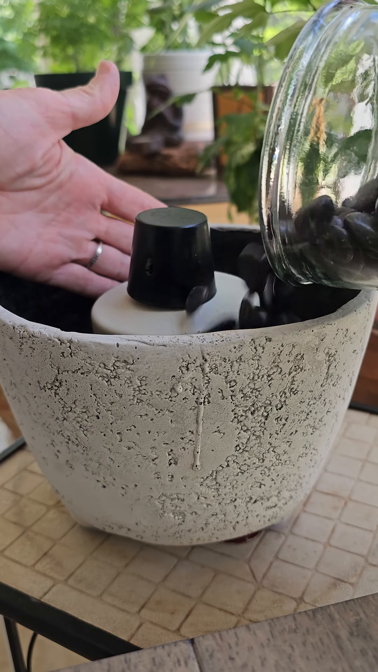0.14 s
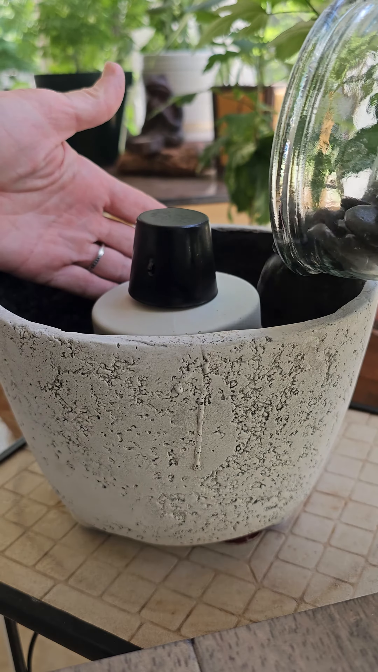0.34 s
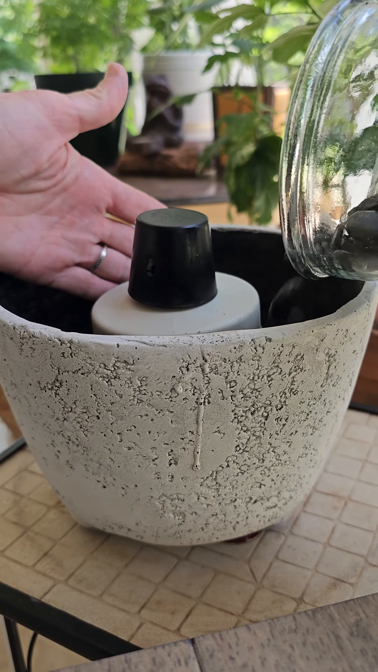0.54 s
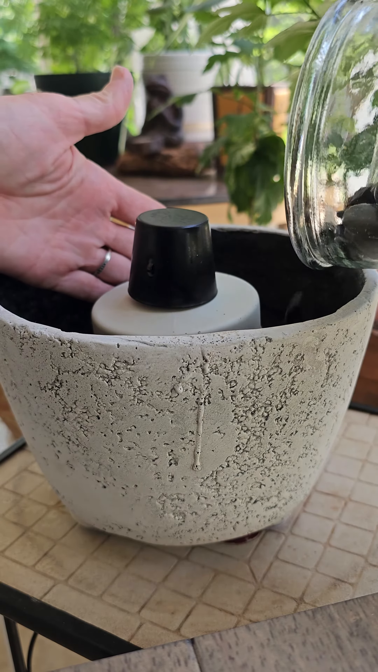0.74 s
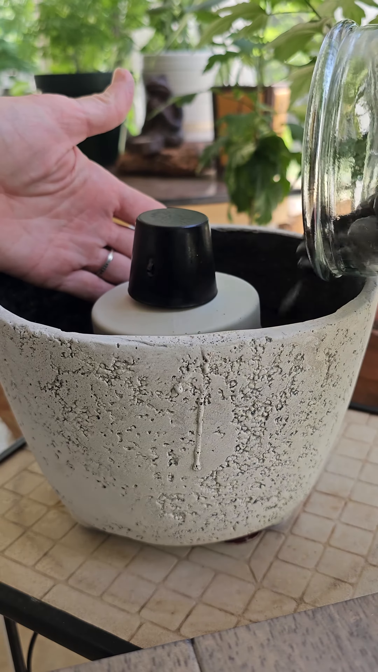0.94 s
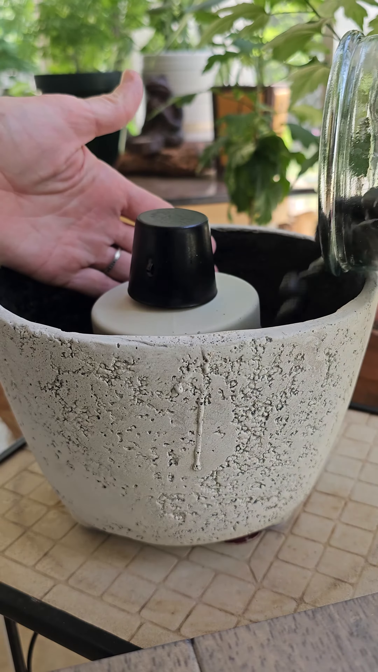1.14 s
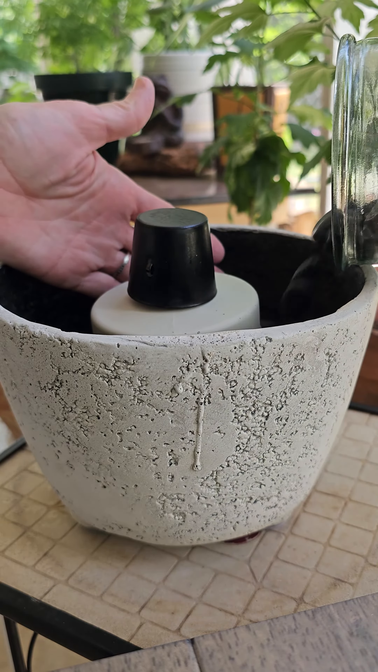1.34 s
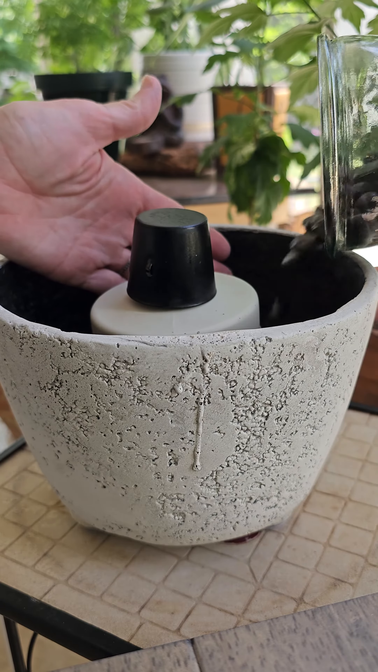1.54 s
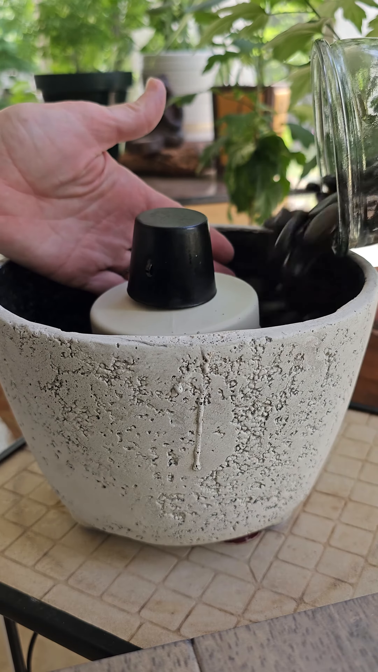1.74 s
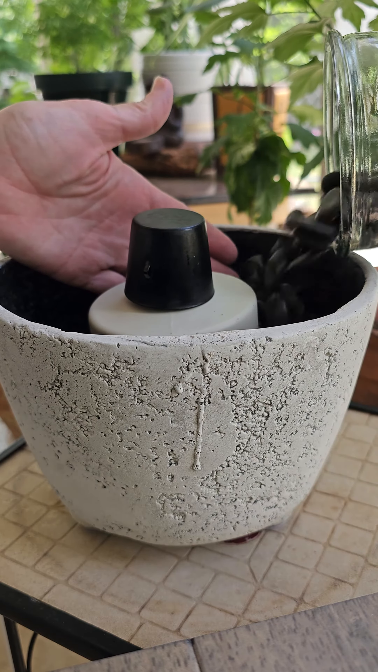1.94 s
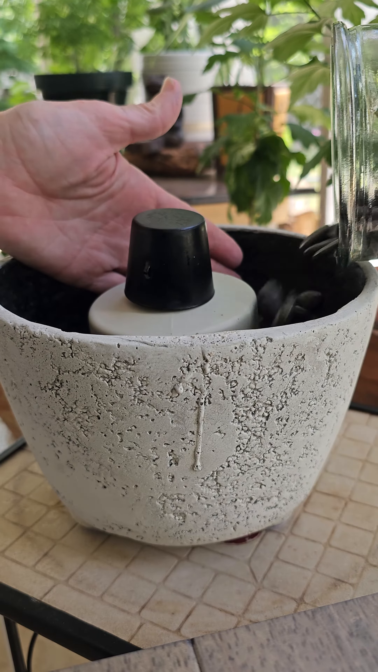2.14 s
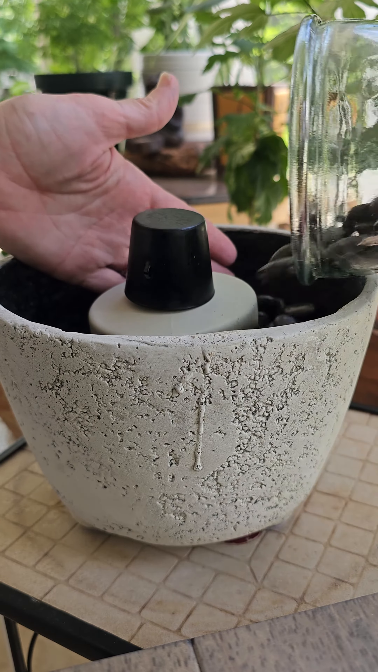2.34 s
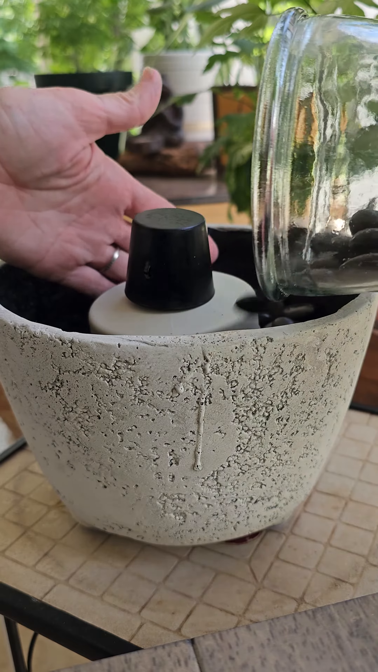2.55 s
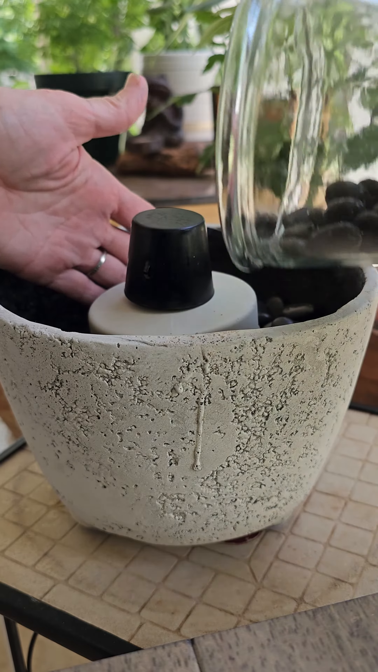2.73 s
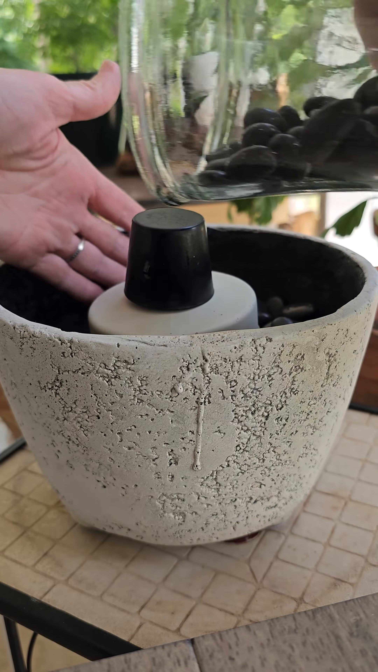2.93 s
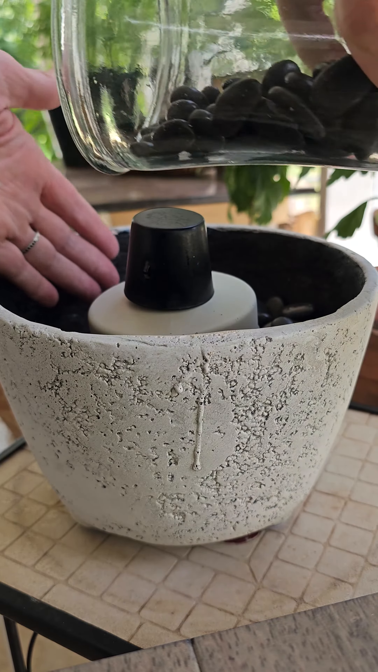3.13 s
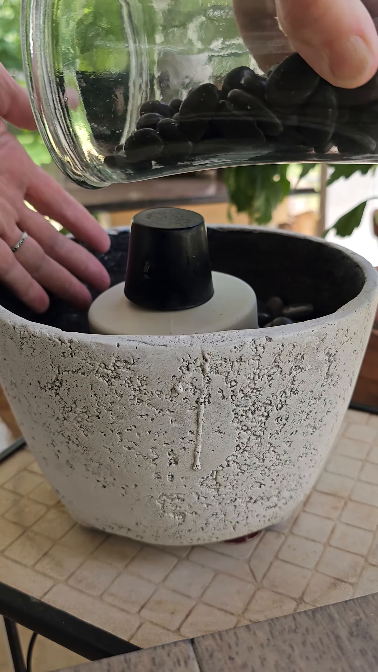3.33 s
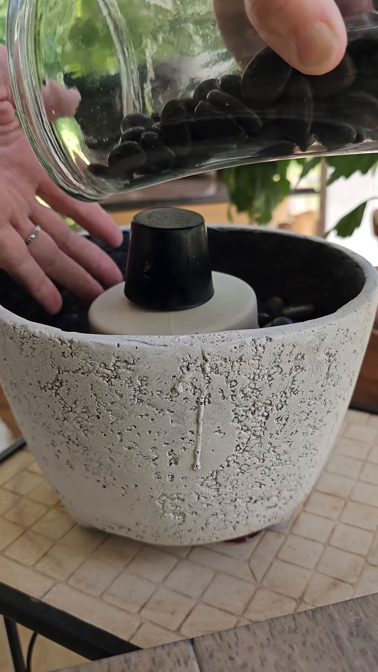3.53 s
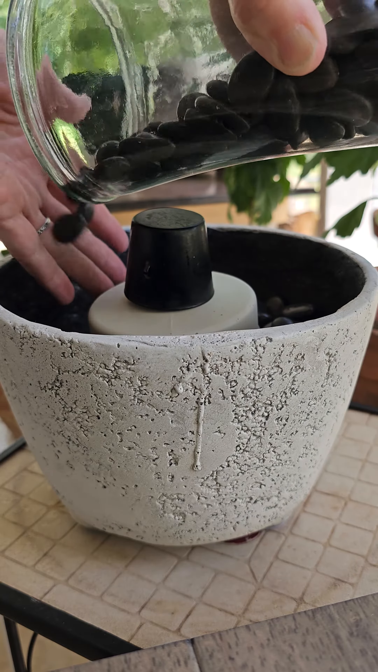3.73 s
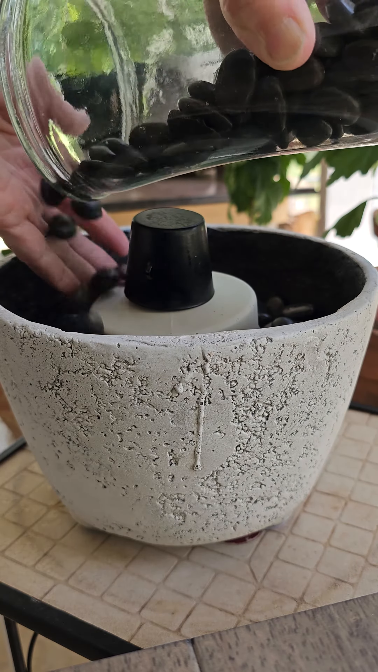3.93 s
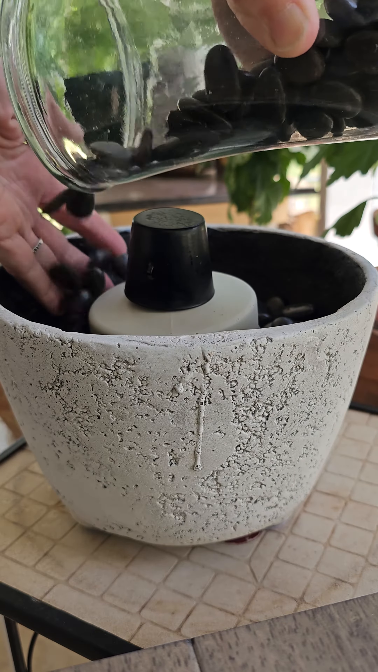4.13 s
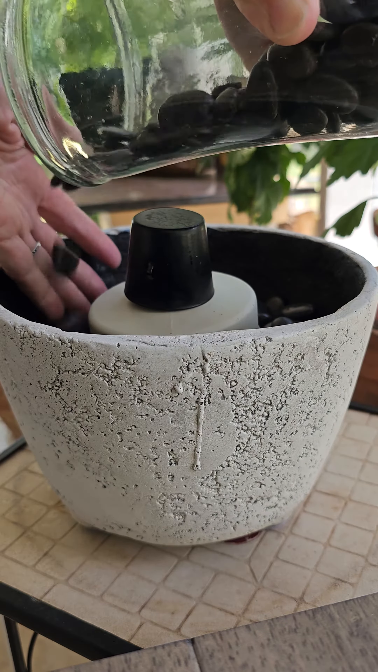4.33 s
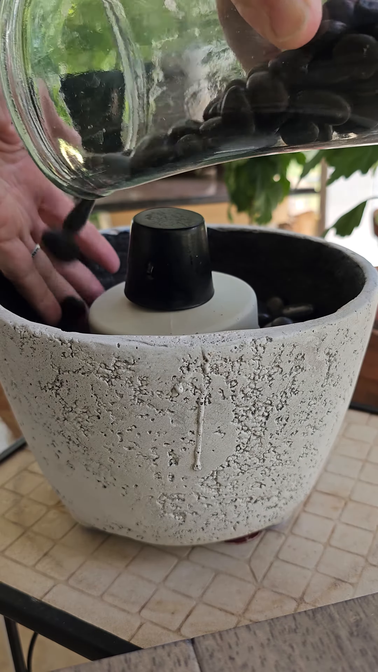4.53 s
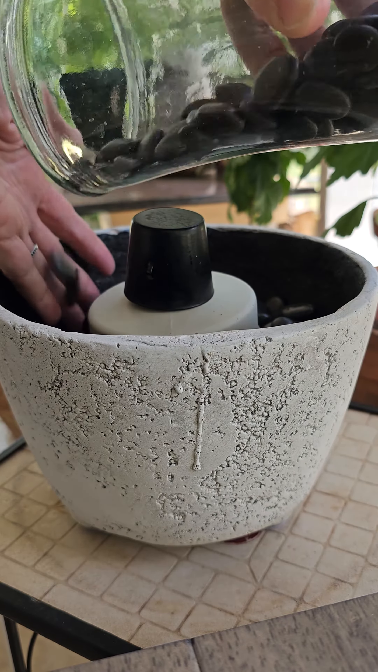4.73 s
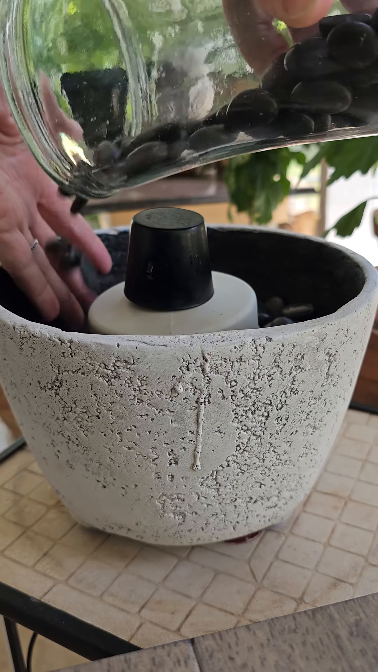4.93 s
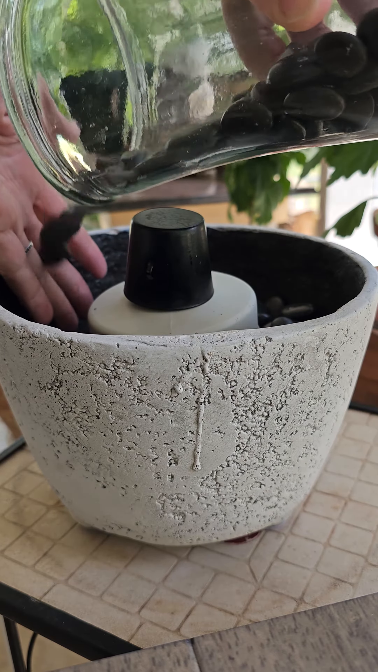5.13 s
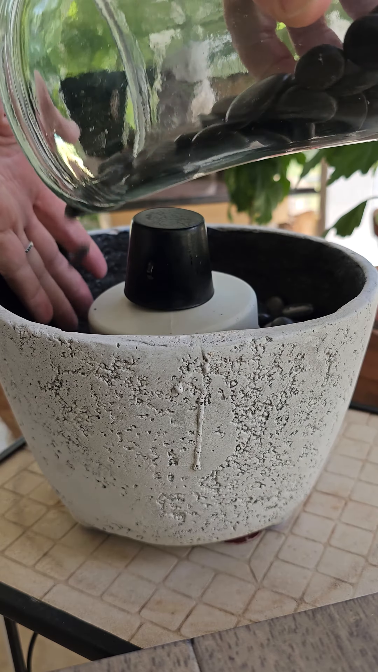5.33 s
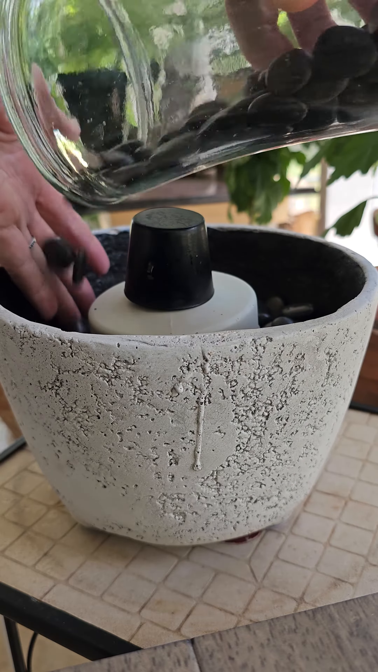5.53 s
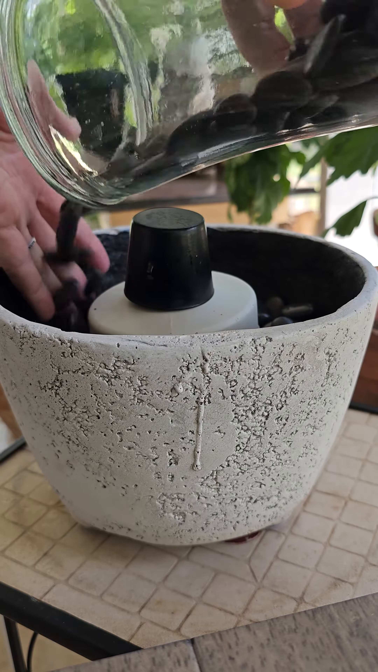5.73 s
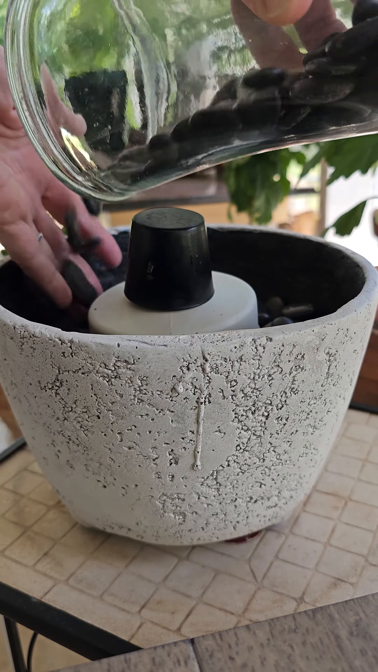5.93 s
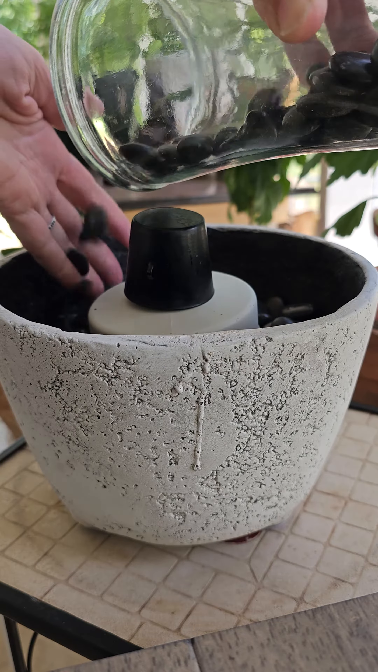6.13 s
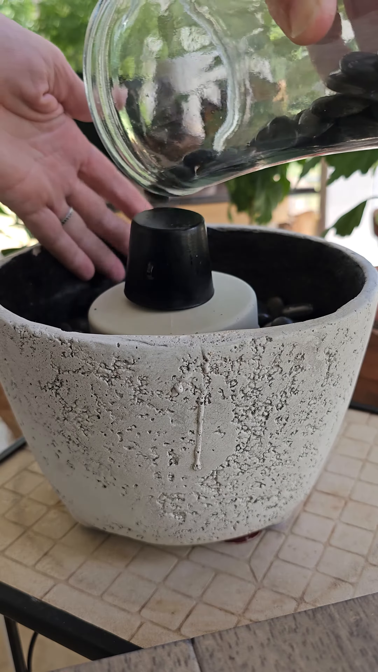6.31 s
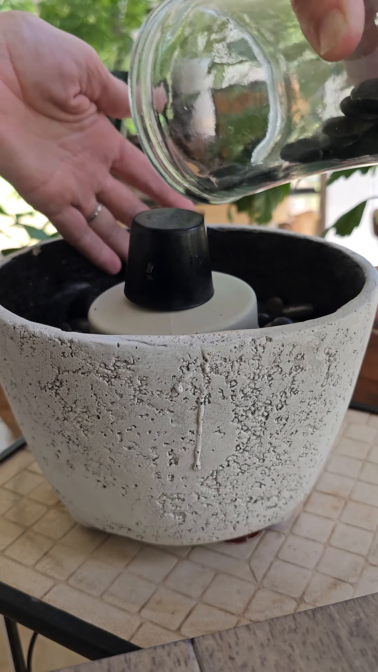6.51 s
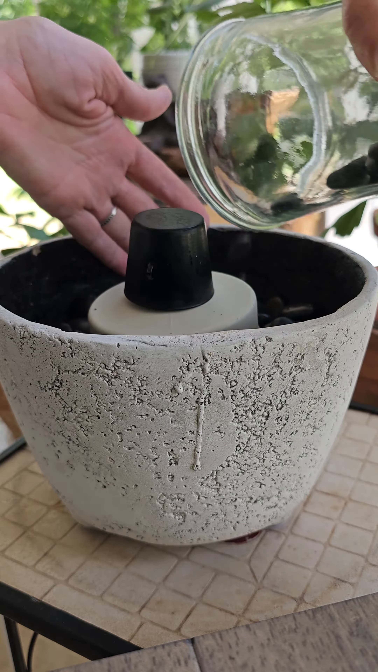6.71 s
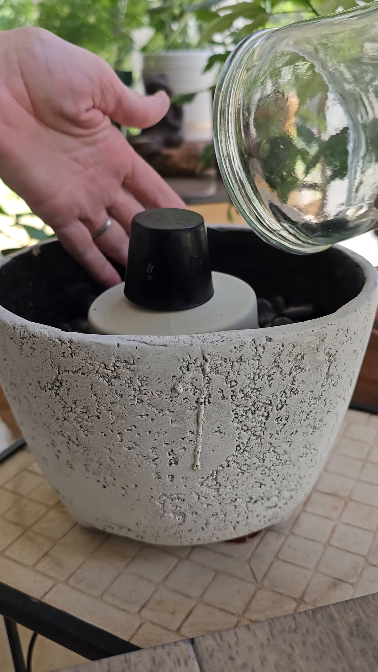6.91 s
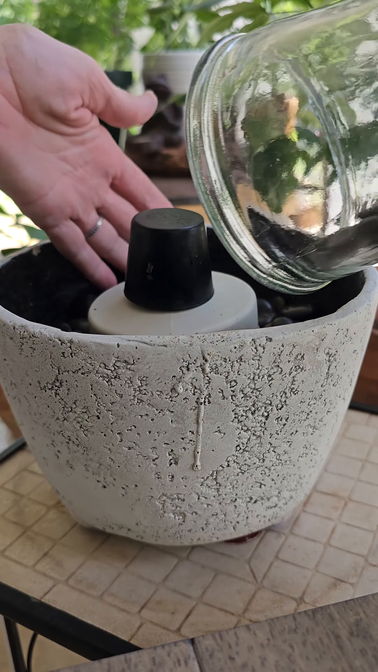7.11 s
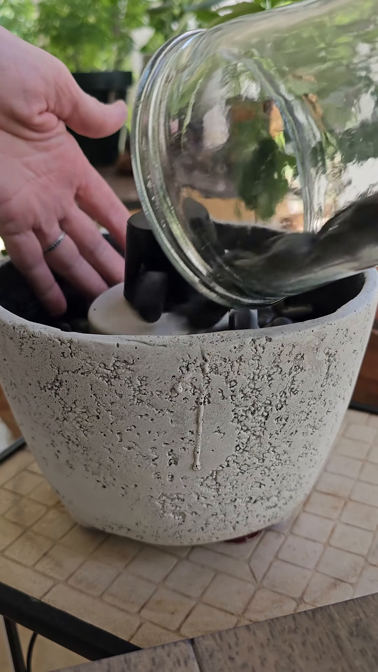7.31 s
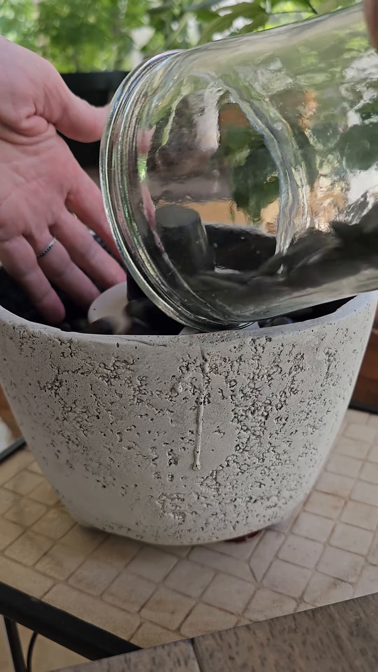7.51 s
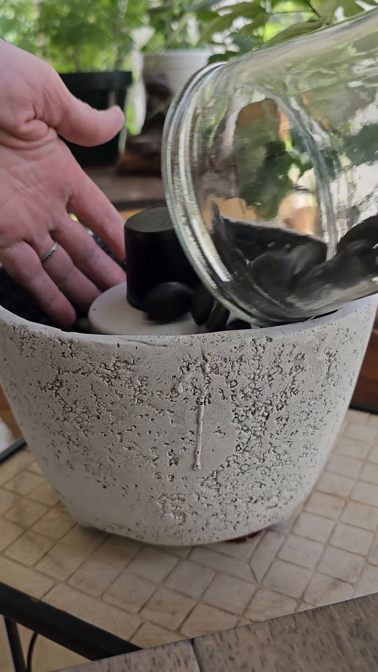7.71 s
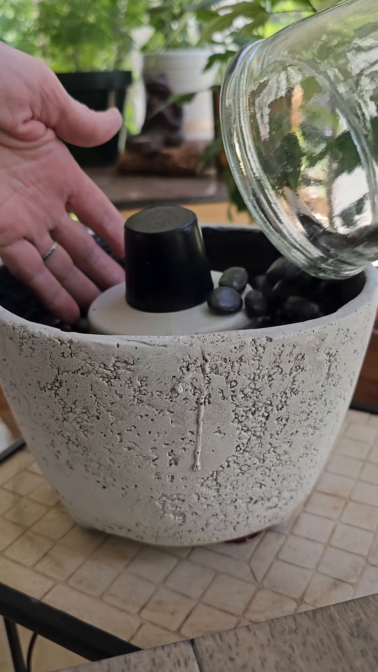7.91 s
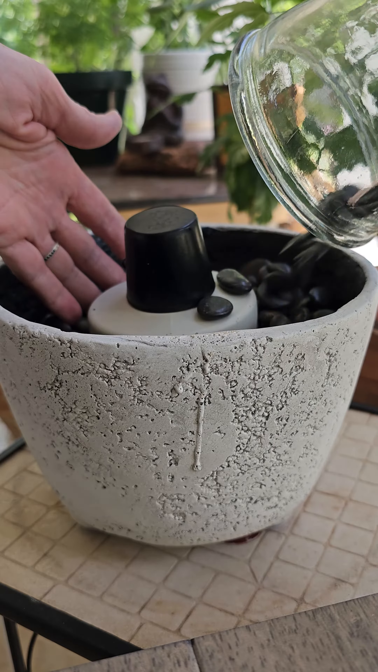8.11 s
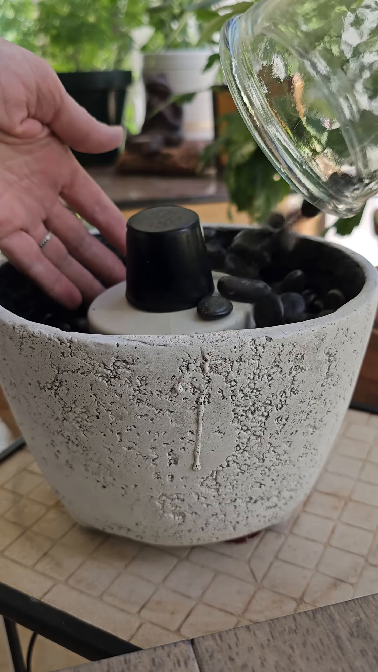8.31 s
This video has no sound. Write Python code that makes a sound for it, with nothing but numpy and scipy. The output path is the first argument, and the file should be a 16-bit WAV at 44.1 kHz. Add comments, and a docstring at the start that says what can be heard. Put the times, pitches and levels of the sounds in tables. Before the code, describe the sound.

Close, bright clacking of small stones tumbling from a jar into a heavy bowl, pausing briefly, then resuming over distant engine drone.

```python
"""Smooth pebbles slide out of a glass jar into a concrete bowl on a porch: a first pour in surges, a near-pause
of a few touches, a second pour, then a third with pebbles rattling along the bare jar wall.
Touches are noise bursts through resonances; jar and bowl are banks of decaying modes; the porch adds a short tail.
Throughout, a far engine (a gliding sine, lower by the end) drones and traffic (coloured noise) murmurs;
a car hums past at 6.7 s, just before the third pour."""
import sys
import numpy as np
from scipy import signal
from scipy.fft import rfft, irfft, next_fast_len
from scipy.io import wavfile
from scipy.ndimage import map_coordinates

SR = 44100
rng = np.random.default_rng(int(sys.argv[2]) if len(sys.argv) > 2 else 0)


def dump_mix(stems):
    """Bounce the given channels to the path in sys.argv[1] as a 16-bit WAV at rate SR."""
    frames = np.atleast_2d(stems).T  # one column per channel
    limited = np.clip(frames, -1, 1)  # hard clip at full scale
    pcm = np.round(limited * 32767).astype(np.int16)
    wavfile.write(sys.argv[1], SR, pcm)


N = 368676
TIME = np.arange(N) / SR

# Pebbles skid along the wall of the nearly empty jar. Each row: start, swell, hold and dying in seconds,
# relative level in dB.
SKIDS = [(7.03, 0.17, 0.52, 1.5, -28), (7.55, 0.73, .2, .4, -21.5)]


def drops():
    """Every hard landing and the weaker hop after it: times in seconds, clack dB, tick dB."""
    # Each row: time in seconds, relative clack level in dB, relative bright tick level in dB.
    landings = [(0.0354, -3.5, -15), (0.0977, -2.5, -14), (0.1296, -4, -11), (0.159, -3.5, -22),
                (0.182, -3.5, -27), (0.214, -10.5, -18), (0.2483, -2.5, -35), (0.2699, -4.5, -35),
                (0.3222, -29, -16), (0.3744, -3.5, -34), (0.4519, -4, -29), (0.5147, -9, -42),
                (0.5482, -13, -22), (0.577, -9.5, -21), (0.6405, -33, -20), (0.765, -22, -29.5),
                (0.798, -43, -33), (0.8457, -28, -31), (0.944, -22, -31), (0.961, -12.5, -25),
                (1.0271, -15.5, -11.5), (1.06, -8, -27), (1.073, -10, -13), (1.1079, -4, -20),
                (1.1722, -19, -14), (1.1977, -8, -35), (1.2536, -6, -18), (1.3098, -0.5, -25),
                (1.3452, -3.5, -36), (1.3798, -9.5, -19), (1.5468, -9.5, -33), (1.6034, -29, -13),
                (1.631, -21, -14), (1.661, -3, -21), (1.7328, -4.5, -23), (1.8003, -4, -23),
                (1.8425, -8.5, -18), (1.927, -7, -32), (1.96, -26, -25), (2.0134, -8, -16),
                (2.124, -15, -17), (2.284, -21, -23), (2.356, -17, -25), (2.3924, -21, -13.5),
                (2.4438, -31, -20.5), (2.476, -1.5, -18), (2.5236, -0.5, -22), (2.582, -9, -24),
                (2.6537, -9.5, -29), (2.7417, -18.5, -34), (2.777, -24.5, -37.5), (2.826, -36, -63),
                (3.3288, -39, -65), (3.47, -32.5, -37), (3.5333, -30.5, -39.5), (3.7924, -22, -18),
                (3.8023, -12.5, -15.5), (3.8463, -18, -18.5), (3.8664, -15, -15), (3.929, -18, -17),
                (3.9927, -11.5, -24), (4.0044, -4, -15), (4.0298, -7.5, -13.5), (4.1134, -17, -17),
                (4.1587, -5, -24), (4.182, -4, -26), (4.2584, -10, -24), (4.3031, -4.5, -19),
                (4.383, -9, -18), (4.46, -13, -14), (4.5107, -9, -24), (4.5451, -5.5, -12),
                (4.5906, -4, -21), (4.626, -19, -14), (4.6824, -16.5, -21.5), (4.741, -14.5, -21),
                (4.7748, -6, -20), (4.803, -32, -14), (4.88, -15.5, -17.5), (4.9322, -9, -22.5),
                (4.9696, -16, -22), (5.0464, -17, -15.5), (5.0633, -16, -16), (5.0963, -12.5, -16),
                (5.131, -10, -17), (5.246, -15, -13), (5.2763, -16, -31), (5.3351, -19, -26),
                (5.3817, -11, -19), (5.4442, -11, -20), (5.4654, -1.5, -15), (5.5553, -10, -18),
                (5.6027, -10, -27), (5.6368, -8.5, -35), (5.691, -14, -16), (5.81, -29, -25),
                (5.8696, -7.5, -34), (5.9657, -5, -34), (6.0214, -14, -15), (6.043, -12, -18),
                (6.093, -23, -18), (6.1435, -11.5, -20), (6.2254, -20, -19), (6.2662, -6, -15),
                (6.313, -14, -27), (6.358, -11, -16), (6.436, -14, -17.5), (6.5126, -11, -22),
                (6.5296, -5, -24), (6.5806, -11, -25), (6.6538, -14.5, -37), (6.7126, -19, -21),
                (6.777, -35, -32), (6.8525, -31.5, -23.5), (6.9707, -23, -24.5), (7.069, -24.5, -25),
                (7.136, -17.5, -24), (7.1737, -27, -25), (7.2735, -21, -15), (7.3215, -3.5, -33),
                (7.3712, -17, -15), (7.4144, -4, -15), (7.4438, -6.5, -18), (7.4904, -4.5, -33),
                (7.5432, -9.5, -14), (7.5915, -6.5, -21), (7.643, -9, -20), (7.6804, -2, -21),
                (7.8229, -6.5, -19), (7.9214, -10, -20), (7.9997, -11, -14), (8.078, -8.5, -16),
                (8.1534, -13, -13), (8.2009, -10, -17), (8.2454, -7.5, -19), (8.3274, -10, -19)]
    clack_gain_db, tick_gain_db = -3.5, 4.5
    rebound_s, rebound_loss_db, rebound_scatter = 0.014, 8.5, 0.3   # scatter: log-normal sigma
    s, clack_db, tick_db = np.transpose(landings)
    first = np.stack([s, clack_db + clack_gain_db, tick_db + tick_gain_db])
    hop_s = rebound_s * np.exp(rebound_scatter * rng.standard_normal(len(s)))
    rebound = np.vstack([s + hop_s, first[1:] - rebound_loss_db])
    return np.hstack([first, rebound])


def tumble(column, spread_db):
    """Small touches inside the slipping mass; column 0 clacks, 1 ticks, 2 rings the jar."""
    # Each row: start, swell, hold and dying in seconds, relative levels of clacks, ticks and jar ring in dB.
    surges = [ (-.05, 0.029, .26, .75, -18.5, -22.5, -22.5), (.55, 0.11, .25, .1, -37.5, -40.5, -55),
              (0.93, 0.054, 0.44, .6, -26, -30, -20.5), (1.56, 0.059, 0.3, .85, -19, -22, -14),
              (2.35, .05, 0.085, 0.44, -33, -31, -45), (3.5, .19, 0.036, 0.065, -32.5, -36, -58),
              (3.77, 0.034, 0.16, .08, -35, -27, -55), (3.95, 0.13, 0.28, .8, -21, -22.5, -41),
              (4.6, 0.28, 1.45, .7, -25, -27.5, -39), (5.52, 0.085, .22, 0.23, -22.5, -21, -40),
              (6.75, 0.22, .15, 0.11, -35, -44.5, -60), (7.06, .12, 1.2, .1, -25, -20, -27),
              (7.15, 0.21, .2, .4, -17, -24, -29), (8.0, 0.17, .2, .2, -18, -19.5, -33), ]
    return shower(surges, column, per_s=130, spread_db=spread_db)


def clacks(s, clack_db):
    """Pebbles of many sizes drop on the heap, over a clatter of smaller shifts."""
    # Pebble landing in the bowl. Each row: resonance in Hz, width in Hz of each of two equal passes,
    # relative near-side level in dB, relative far-side level in dB.
    clack_modes = [(2122, 1050, -9, -4.5), (2630, 130, -8.5, -5.5), (3296, 420, 4, 2.5),
                   (3550, 110, 9, -2.5), (4246, 444, 4, 9), (5264, 644, 1, 1), (7230, 3200, -8.5, -10.5)]
    loud = contacts(s, clack_db, clack_modes, build_s=0.0025, scatter_s=0.009, tail_db=-7,
                    size_spread=0.032, vary_db=3)
    times, db = tumble(column=0, spread_db=9.5)
    small = contacts(times, db - 3, clack_modes, build_s=0.002, scatter_s=0.017, tail_db=-7,
                     size_spread=0.039, vary_db=4)
    return loud + small


def ticks(s, tick_db):
    """Hard, glancing touches excite the high resonances and give the bright edge."""
    # Glancing touch. Each row: resonance in Hz, width in Hz of each of two equal passes,
    # relative near-side level in dB, relative far-side level in dB.
    tick_modes = [(5080, 1400, -7.5, -2.5), (7480, 3500, -8.5, -4), (8450, 1100, -4.5, -4.5),
                  (9510, 660, -5, -2), (11530, 1100, 4, 4.5), (12660, 2300, 0.5, -0.5),
                  (14500, 2900, -6, -2.5)]
    loud = contacts(s, tick_db, tick_modes, build_s=0.0026, scatter_s=0.009, tail_db=-4,
                    size_spread=0.012, vary_db=3)
    times, db = tumble(column=1, spread_db=9.5)
    small = contacts(times, db + 0.5, tick_modes, build_s=0.0015, scatter_s=0.021, tail_db=0,
                     size_spread=0.013, vary_db=6.5)
    return loud + small


def jar():
    """Glass modes ping under single strikes, shimmer under the sliding mass and rattle when nearly empty."""
    # Pebble strikes the jar. Each row: time in seconds, ping level in dB.
    jar_strikes = [(0.1356, -14.5), (0.2224, -15), (0.3376, -11.5), (0.4289, -13.5), (0.494, -18),
                   (0.5502, -14), (0.643, -16.5), (0.797, -23), (0.964, -15), (1.0171, -10), (1.1584, -12),
                   (1.2523, -17), (1.4254, -9), (1.536, -16.5), (1.6278, -13), (1.7474, -9), (1.788, -8),
                   (1.8296, -10), (1.8919, -15), (2.0014, -14), (2.0525, -10.5), (2.1458, -9),
                   (2.2274, -19), (2.4431, -18), (4.1972, -12.5), (4.2542, -13), (4.4693, -18), (4.51, -12),
                   (4.5408, -11.5), (4.6764, -20.5), (4.8028, -18), (5.0634, -10.5), (5.216, -14.5),
                   (5.456, -11), (5.5578, -18), (5.6477, -22), (5.8065, -9), (5.9755, -14.5), (6.0224, -12),
                   (6.0865, -14), (6.3127, -12), (6.4427, -18.5), (6.7768, -12.5), (6.8884, -26)]
    # Modes of the jar. Each row: frequency in Hz, relative level in dB, t60 in seconds.
    jar_modes = [(7310, -1, 0.11), (7673, 0, 0.056), (7900, -26.5, 0.045), (8000, 2.5, 0.07),
                 (9820, -0.5, 0.062), (12800, -24, 0.042), (12600, -4, .1), (14680, -14, .07)]
    # Modes of its bare wall. Each row: frequency in Hz, relative level in dB, t60 in seconds.
    wall_modes = [(1637, -6.5, 0.043), (1898, -4.5, 0.048), (3320, -36, 0.061), (4170, -1.5, 0.17),
                  (4950, 3.5, 0.076), (7270, -23, 0.052), (8600, -4, 0.044), (8710, -2.5, 0.18),
                  (10594, -10.5, 0.17), (12600, -9, 0.048), (11526, 8.5, .06)]
    s, ring_db = np.transpose(jar_strikes)
    times, db = tumble(column=2, spread_db=9.5)
    ring = modal(np.hstack([s, times]), np.hstack([ring_db, db - 6.5]), jar_modes,
                 vary_db=4.5, waver_s=0.00005)
    times, db = shower(SKIDS, column=0, per_s=240, spread_db=4)
    rattle = modal(times, db - 3.5, wall_modes, vary_db=7, waver_s=0.00008)
    return ring + rattle


def bowl(s, clack_db, tick_db):
    """The heavy bowl answers each pebble with a short, soft thud; the heap cushions the hardest blows."""
    # Dull modes of the bowl and its air. Each row: frequency in Hz, relative level in dB,
    # t60 in seconds (modal() holds it to at least 5 ms).
    bowl_modes = [(520, -26.5, 0.0042), (620, -3.5, 0.028), (695, -0.5, 0.027), (1250, -4, 0.016)]
    times, db = tumble(column=0, spread_db=5)
    blow_db = np.hstack([np.maximum(clack_db, tick_db - 4), db - 4])
    cushioned_db = 0.7 * blow_db   # compresses the level range
    skid_s, skid_db = shower(SKIDS, column=0, per_s=130, spread_db=5)
    thud_db = np.hstack([cushioned_db - 23, skid_db - 13.5])
    return modal(np.hstack([s, times, skid_s]), thud_db, bowl_modes, vary_db=15, waver_s=0.0001)


def shower(surges, column, per_s, spread_db):
    """Uneven small touches (times, dB); surges swell, hold and die away, and overlaps add in power."""
    count = int(N / SR * per_s)
    slip, strength = rng.random((count, 2)).T
    times = (np.arange(count) + slip) / per_s   # one touch per slot
    power = 1e-12
    for start, swell, hold, dying, *levels_db in surges:
        corners_s = start + np.cumsum([0, swell, hold, dying])
        speed = np.interp(times, corners_s, [0, 1, 1, 0])
        power = power + (from_db(levels_db[column]) * speed ** 2) ** 2
    return times, 10 * np.log10(power) + spread_db * (2 * strength - 1)


def contacts(times, level_db, modes, build_s, scatter_s, tail_db, size_spread, vary_db, size=640):
    """Each contact rings a pebble of its own size and scatters round the bowl; level: energy over 6 ms."""
    # Where the stream lands. Each row: time in seconds, position from 0 (near side) to 1 (far side).
    aim = [(2.8, 0.041), (3.6, 1), (6.6, 0.78), (7.1, 0.67)]
    count, t, hz = len(times), np.arange(size) / SR, np.fft.rfftfreq(size, 1 / SR)

    # reflections crowd in for a few ms, then thin out
    crowd = t / (build_s * np.exp(0.2 * rng.standard_normal((count, 1))))
    fade = np.cos(np.pi / 2 * t / t[-1])
    late = from_db(tail_db) * np.exp(-t / scatter_s) * fade
    arrivals = np.minimum(0.25 + crowd, 1) * (np.exp(-crowd ** 2 / 2) + late)
    shared, left, right = rfft(rng.standard_normal((3, count, size)) * arrivals)

    # long waves reach both ears alike; the right ear hears them a little later
    apart = 1.17 * hz / (hz + 1200)
    lag_s = 0.000393 + 0.00011 * rng.standard_normal((count, 1))
    delayed = shared * np.exp(-2j * np.pi * hz * lag_s)
    paths = np.stack([shared + apart * left, delayed + apart * right]) / np.sqrt(1 + apart ** 2)

    far = np.interp(times, *np.transpose(aim))[:, None]
    pitch = np.exp(size_spread * rng.standard_normal((count, 1)))
    body = 0
    for centre_hz, width_hz, near_db, far_db in modes:
        peak = hz * width_hz / (hz * width_hz + 1j * (hz ** 2 - (centre_hz * pitch) ** 2))
        db = near_db + far * (far_db - near_db) + vary_db * rng.standard_normal((count, 1))
        sign = rng.choice([-1, 1], (count, 1))
        body = body + peak * peak * from_db(db) * sign
    hits = irfft(paths * body)

    power = np.mean(np.sum(hits ** 2, axis=2), axis=0) / (0.006 * SR)
    hits = hits * (from_db(level_db) / np.sqrt(power))[:, None]
    at = (np.maximum(times, 0) * SR).astype(int)[:, None] + np.arange(size)
    return np.stack([np.bincount(at.ravel(), side.ravel(), N)[:N] for side in hits])


def modal(times, level_db, modes, vary_db, waver_s):
    """Each blow shares its energy among decaying modes in its own way; the shifting load wavers the pitch."""
    at, out = np.clip((times * SR).astype(int), 0, N - 1), np.zeros((2, N))
    usual = from_db(np.array(modes)[:, 1])
    shares = usual * from_db(vary_db * rng.standard_normal((len(at), len(modes))))
    shares = shares * np.linalg.norm(usual) / np.linalg.norm(shares, axis=1, keepdims=True)
    for (hz, _, t60_s), share in zip(modes, shares.T):
        r = from_db(-60 / (max(t60_s, 0.005) * SR))
        w = 2 * np.pi * hz / SR
        for side in out:
            # each ear hears the blow by a slightly different path
            path_samples = rng.integers(0, 16, len(at))
            clicks = np.bincount(at + path_samples, from_db(level_db) * share, N)[:N]
            side += signal.lfilter([0, np.sin(w)], [1, -2 * r * np.cos(w), r * r], clicks + 1e-18)
    load = signal.resample(rng.standard_normal(200), N)
    read_at = (TIME + waver_s * load) * SR
    return np.stack([map_coordinates(side, [read_at]) for side in out])


def porch(x, t60_s=0.12, level_db=-7.5, dull_hz=9000, gap_s=0.0026):
    """A short diffuse tail from the table, floor and house wall: convolution with decaying, dulled noise."""
    t = TIME[:SR // 2]
    tail = rng.standard_normal((2, len(t))) * from_db(-60 * t / t60_s) * (t > gap_s)
    dull = np.exp(-2 * np.pi * dull_hz / SR)
    tail = signal.lfilter([1 - dull], [1, -dull], tail)
    tail = tail / np.sqrt(np.sum(tail ** 2, axis=1, keepdims=True))
    return from_db(level_db) * signal.fftconvolve(x, tail, axes=1)[:, :N]


def ports(x):
    """Two microphone ports hear the pour differently: weights left and right at constant summed power gain."""
    # Each row: frequency in Hz, left minus right in dB.
    balance = [(300, 2), (650, -2), (1200, 3.5), (1800, -1), (2400, 2), (3300, 1), (4400, -2.5),
               (5600, -2.5), (6900, 10.5), (8600, 9.5), (10000, 22), (11400, -0.5), (12700, 3), (13400, 5),
               (14300, 7.5), (15500, 11)]
    size = next_fast_len(N + 2048)
    ratio = from_db(at_hz(balance, np.fft.rfftfreq(size, 1 / SR)))
    right = np.sqrt(2 / (1 + ratio ** 2))
    return irfft(rfft(x, size) * np.stack([right * ratio, right]), size)[:, :N]


def engine():
    """A far engine drone: one sine whose pitch wanders and ends lower."""
    # Each row: time in seconds, frequency in Hz, relative level in dB.
    track = [(0.0, 56.13, -45), (1.58, 55.4, -44), (1.65, 53.34, -49), (2.51, 48.8, -47),
             (3.12, 48.84, -39), (3.91, 51.9, -40), (5.66, 46.1, -43.5), (5.98, 42, -49), (6.47, 38.5, -51),
             (7.17, 37.25, -48), (8.36, 36.06, -61)]
    hz, db = in_time(track)
    return np.sqrt(2) * from_db(db + 4) * np.sin(2 * np.pi * np.cumsum(hz) / SR)


def traffic():
    """Traffic beyond the garden: rumble, murmur and tyre noise under one moving level."""
    # Each row: time in seconds, level in dB applied to the sum of the three parts.
    level = [(0.0, -45), (0.23, -48), (2.51, -47.5), (3.68, -41.5), (6.22, -40), (6.63, -39), (7.15, -44.5),
             (8.36, -46)]
    # Spectra. Each row: frequency in Hz, relative level in dB per Hz.
    rumble = [(20, -25), (40, 5.5), (70, 4), (120, 4), (170, -1.5), (260, -28.5), (500, -46.5)]
    murmur = [(90, -17.5), (150, -2), (230, 9.5), (310, 7.5), (390, -11.5), (600, -34), (2000, -63)]
    tyres = [(250, -20), (400, -6), (550, -2), (850, -3), (1200, 1), (1700, -6.5), (3000, -22),
             (8000, -35.5)]
    road = from_db(3.5) * noise(rumble) + from_db(-0.5) * noise(murmur) + noise(tyres)
    return from_db(in_time(level)) * road


def passing_car(nearest_s=6.7, half_s=0.39, peak_db=-35):
    """A car hums past: low noise that swells and falls, at half amplitude half_s from its nearest moment."""
    # Each row: frequency in Hz, relative level in dB per Hz.
    hum = [(100, -34), (140, -1), (190, 0), (230, 6.5), (275, -4), (340, -32), (900, -55.5)]
    nearness = 1 / (1 + ((TIME - nearest_s) / half_s) ** 2)
    return from_db(peak_db) * nearness * noise(hum)


def faint_air():
    """Steady faint air: coloured noise."""
    # Each row: frequency in Hz, relative level in dB per Hz.
    air = [(200, -7), (600, 0), (1200, -15), (2500, -2.5), (4500, -4), (8000, -13), (11500, -26),
           (16000, -41)]
    return from_db(-51.5) * noise(air)


def noise(spectrum):
    """Stereo noise of a given colour at unit power, alike on both sides in the bass."""
    # Each row: frequency in Hz, left-right correlation from 0 to 1.
    likeness = [(100, 0.96), (250, 0.97), (500, 0.76), (1000, 0), (3000, 0)]
    hz = np.fft.rfftfreq(N, 1 / SR)
    mid, side = rfft(rng.standard_normal((2, N)))
    alike = np.clip(at_hz(likeness, hz), 0, 1)
    both = np.sqrt(1 + alike) * mid + np.sqrt(1 - alike) * side * [[1], [-1]]
    x = irfft(both * from_db(at_hz(spectrum, hz)), N)
    return x / np.sqrt(np.mean(x ** 2) + 1e-20)


def from_db(db):
    """Decibels to gain."""
    return 10 ** (np.asarray(db) / 20)


def in_time(rows):
    """Columns of a curve, sample by sample; the first and last values hold."""
    s, *columns = np.transpose(rows)
    return [np.interp(TIME, s, c) for c in columns]


def at_hz(points, hz):
    """Read a spectrum on a log-frequency axis."""
    f, value = np.transpose(points)
    return np.interp(np.log(hz + 1), np.log(f), value)


def scene():
    """The pour close by, the street behind."""
    s, clack_db, tick_db = drops()
    pour = clacks(s, clack_db) + ticks(s, tick_db) + jar() + bowl(s, clack_db, tick_db)
    street = engine() + traffic() + passing_car() + faint_air()
    return ports(pour + porch(pour)) + street


def record(dry, cutoff_hz=15850):
    """A tanh scales the level and rounds the tallest peaks; a steep low-pass cuts the top."""
    rounded = 0.94 * np.tanh(dry / 1.377)
    low_pass = signal.ellip(12, 0.2, 80, cutoff_hz, fs=SR, output="sos")   # order, ripple dB, stop dB
    return signal.sosfilt(low_pass, rounded)


dry = scene()
out = record(dry)
dump_mix(out)
```